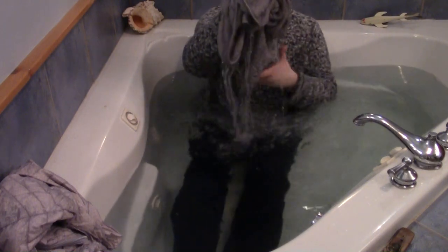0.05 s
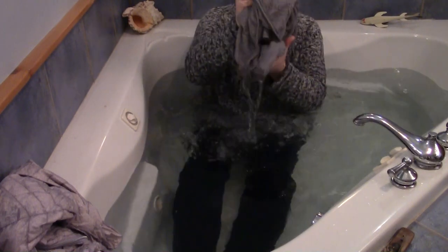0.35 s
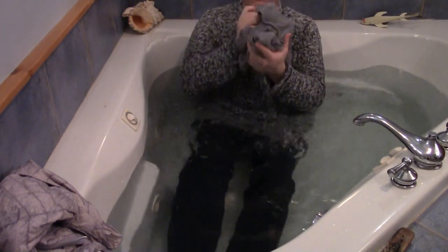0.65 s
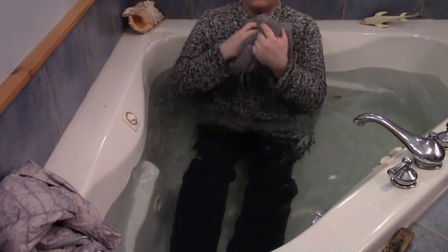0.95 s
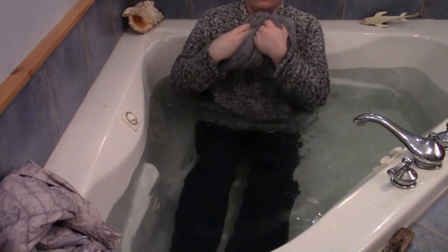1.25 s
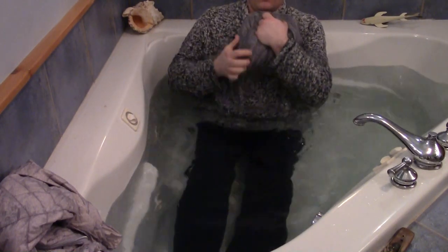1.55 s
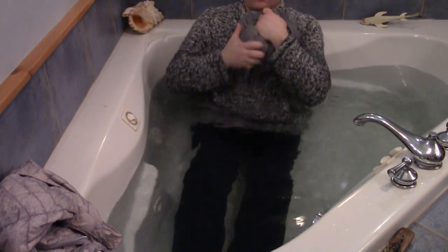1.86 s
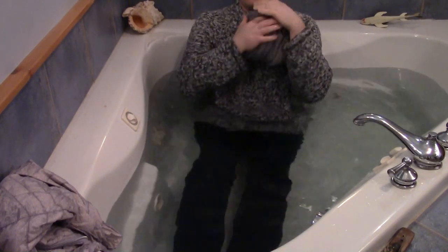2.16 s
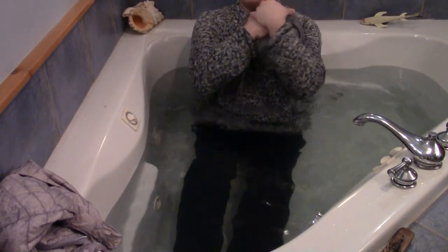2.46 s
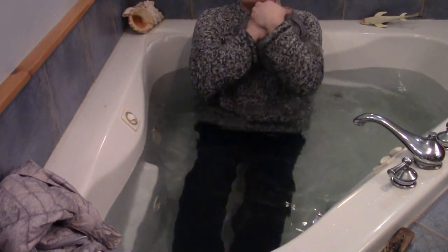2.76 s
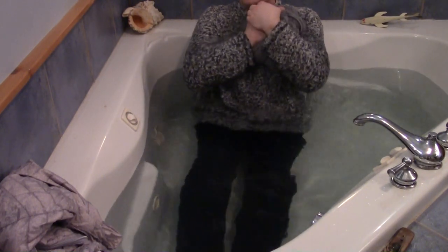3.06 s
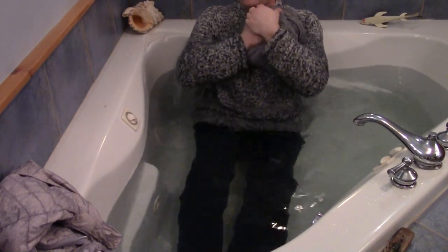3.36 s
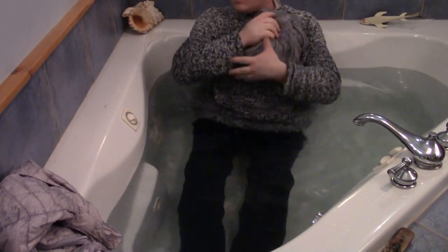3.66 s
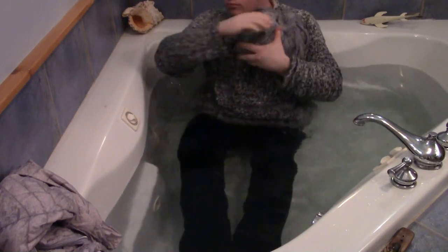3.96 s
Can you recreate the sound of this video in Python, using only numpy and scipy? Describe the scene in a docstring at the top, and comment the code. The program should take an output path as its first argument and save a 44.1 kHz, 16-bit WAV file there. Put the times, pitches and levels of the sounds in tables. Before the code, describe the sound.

Water pours and drips into a full bathtub as a soaked cloth is squeezed.

```python
"""Water pours and patters into a full bathtub, off a soaked cloth squeezed against wet clothes.
It thins to a dribble and spurts again with each squeeze; each drop is a tiny impact and a ringing bubble.
Nearer the microphone, single plops and wet spats stand out. The tub and the tiled bathroom ring
around them, over faint room air and mains hum. The image is nearly mono."""
import sys
import numpy as np
from scipy import signal
from scipy.fft import rfft, irfft, next_fast_len
from scipy.io import wavfile

SR = 44100
rng = np.random.default_rng(int(sys.argv[2]) if len(sys.argv) > 2 else 0)


def dump(signal):
    """Clip the signal to [-1, 1] and save it as 16-bit WAV at the path in sys.argv[1]."""
    limited = np.clip(np.atleast_2d(signal).T, -1, 1)
    pcm = np.round(limited * 32767).astype(np.int16)
    wavfile.write(sys.argv[1], SR, pcm)


N = 176400
TIME = np.arange(N) / SR


def amp(db):
    """Decibels to gain."""
    return 10 ** (np.asarray(db) / 20)


def unit(x):
    """Scales to rms 1."""
    return x / np.sqrt(np.mean(x ** 2) + 1e-20)


def read(points, hz):
    """Reads a table on a log-frequency axis."""
    table_hz, value = np.transpose(points)
    return np.interp(np.log(hz + 1), np.log(table_hz + 1), value)


def shaped(x, colour):
    """Filters by a table of (frequency [Hz], gain [dB])."""
    size = next_fast_len(N + 4096)
    gain = amp(read(colour, np.fft.rfftfreq(size, 1 / SR)))
    return irfft(rfft(x, size) * gain, size)[..., :N]


def add(mix, start_s, sound):
    """Mixes a sound in at a time."""
    part = mix[max(round(start_s * SR), 0):][:len(sound)]
    part += sound[:len(part)]


# Colour of the bathroom's still air (frequency [Hz], relative level [dB])
AIR_COLOUR = [(20, -26), (45, -4), (90, -5.5), (170, 6), (300, 7), (1000, -2.5), (15000, -34)]

def room_tone(air_db=-61, hum_hz=60.2, hum_db=-89):
    """Faint air all around the microphone, partly shared by left and right, with a trace of mains hum."""
    shared, left, right = (unit(shaped(noise, AIR_COLOUR)) for noise in rng.standard_normal((3, N)))
    air = 0.79 * shared + 0.65 * np.array([left, right])
    return amp(air_db) * air + amp(hum_db) * np.sin(2 * np.pi * hum_hz * TIME)


# Decay of the tiled room (frequency [Hz], time to fall 60 dB [s])
TILE_DECAY = [(250, 0.67), (700, 0.46), (2000, 0.34), (5000, 0.43), (14000, 0.23)]

def tile_tail(size=24000, build_s=0.011):
    """Dense reflections off the tiles, the treble dying first; energy 1."""
    taps = rng.standard_normal(size) * (rng.random(size) < 0.2)
    taps *= np.minimum(np.arange(size) / SR / build_s, 1)
    hz, t, spectrum = signal.stft(taps, SR, nperseg=256)
    decay = amp(-60 * t / read(TILE_DECAY, hz)[:, None])
    tail = signal.istft(spectrum * decay, SR, nperseg=256)[1][:size]
    return tail / np.linalg.norm(tail)


def path_to_microphone(echo_db, tail_db=-2, early_db=-6.5, early_span_s=0.016, echoes=12):
    """From one spot in the bath: direct sound, first echoes off the tub walls, then the tail."""
    response = amp(tail_db + echo_db) * tile_tail()
    response[0] += 1  # direct sound
    echo_gain = amp(early_db + echo_db) / np.sqrt(echoes)
    for place, sign in zip(rng.random(echoes), rng.choice([-1, 1], echoes)):
        delay_s = 0.001 + early_span_s * place
        response[round(delay_s * SR)] += sign * echo_gain
    return response / np.linalg.norm(response)


# Resonances of the tub and room (frequency [Hz], gain [dB], time to fall 60 dB [s])
TUB_MODES = [(330, -21, 0.78), (440, 6, 0.24), (545, -6.5, 0.27), (658, 0, 0.32), (853, 5, 0.47),
             (1130, -3.5, 0.45)]
# Left-right difference at the microphone (frequency [Hz], side gain [dB])
STEREO_WIDTH = [(200, -82), (600, -39), (1200, -43), (2000, -24.5), (4000, -20.5), (14000, -15.5)]

def bathroom(far, near, near_echo_db=-0.5):
    """Each spot has its own reflections, a little weaker near the microphone; all of them ring the tub."""
    spots = [(sound, 0) for sound in far] + [(sound, near_echo_db) for sound in near]
    mid = sum(signal.oaconvolve(sound, path_to_microphone(echo_db))[:N] for sound, echo_db in spots)
    total = sum(sound for sound, _ in spots)
    for hz, db, t60 in TUB_MODES:
        q = hz * t60 * np.pi / np.log(1000)
        mid += amp(db) * signal.lfilter(*signal.iirpeak(hz, q, SR), total)
    side = shaped(signal.oaconvolve(total, tile_tail())[:N], STEREO_WIDTH)
    return np.array([mid + side, mid - side])


# Wet smacks near the microphone (time [s], centre [Hz], level before colour [dB], decay [s])
NEAR_SPATS = [(0.256, 5000, -24.5, 0.014), (0.341, 3740, -16, 0.0019), (0.575, 7460, -26, 0.0035),
              (0.8113, 3200, -28, 0.0038), (0.811, 11500, -33, 0.005), (0.839, 11000, -34.5, 0.0027),
              (0.8576, 13000, -32.5, 0.0035), (0.9057, 6000, -26, 0.0039), (0.9717, 3280, -24, 0.0029),
              (0.966, 9900, -31, .002), (0.972, 9400, -27.5, 0.0046), (1.025, 9700, -29.5, 0.0066),
              (1.021, 3900, -26.5, 0.0041), (1.1513, 3900, -26.5, 0.027), (1.636, 3350, -32, 0.0082),
              (1.682, 2740, -28, 0.0067), (1.6894, 8450, -24, 0.0022), (1.699, 7760, -21.5, 0.0015),
              (1.9015, 8500, -32, 0.0018), (2.0033, 6200, -30.5, 0.0047), (2.148, 8900, -36, 0.0058),
              (2.19, 915, -29.5, 0.0047), (2.493, 3140, -33, 0.0069), (2.6048, 10100, -33.5, 0.0028),
              (2.6446, 6000, -35, 0.0082), (2.646, 2800, -32, 0.0086), (2.694, 3100, -30.5, 0.013),
              (2.722, 3780, -33, 0.009), (3.034, 5650, -26.5, 0.017), (3.172, 8000, -30, .003),
              (3.393, 3040, -22.5, 0.0021), (3.5017, 4370, -31, 0.0022), (3.564, 2900, -30, 0.0087),
              (3.737, 3000, -23.5, 0.0024), (3.7387, 1410, -22, 0.0033), (3.931, 2200, -28.5, 0.0028)]
# Their colour (frequency [Hz], gain [dB])
SPAT_COLOUR = [(60, -24), (250, -27), (1000, -4.5), (4500, -2), (9000, -2.5), (11500, -2.5), (15000, -7)]

def spats(relative_bandwidth=0.53):
    """Brief bursts of spray as water or wet cloth smacks down."""
    out, t = np.zeros(N), np.arange(4096) / SR
    for start_s, hz, db, decay_s in NEAR_SPATS:
        noise = rng.standard_normal(len(t))
        burst = signal.lfilter(*signal.iirpeak(hz, 1 / relative_bandwidth, SR), noise)
        top_hz = min(1.46 * hz, SR / 3)
        burst = signal.lfilter(*signal.butter(2, top_hz, fs=SR), burst)
        add(out, start_s, amp(db) * unit(burst) * np.exp(-t / decay_s))
    return shaped(out, SPAT_COLOUR)


def bubble(hz, cycles, rise=0.1095, attack_cycles=1.2):
    """A dying sine whose pitch rises as the bubble nears the surface, by the share `rise` per decay time."""
    turns = np.arange(0, 7 * cycles, hz / SR)
    envelope = (1 - np.exp(-turns / attack_cycles)) * np.exp(-turns / cycles)
    phase = 2 * np.pi * turns * (1 + rise * turns / cycles / 2)
    return envelope / envelope.max() * np.sin(phase)


# Bubble plops near the microphone, plus one wet slap with a low thud near 3.74 s
# (time [s], pitch [Hz], level before colour [dB], decay [cycles])
PLOPS_AND_SLAP = [(.003, 1053, -34, 8.2), (.034, 330, -26, 1.8), (.036, 2036, -25, 43),
                  (0.051, 1810, -21, 6.9), (0.058, 1053, -21.5, 8.5), (.076, 925, -22.5, 4.1),
                  (.078, 2980, -26, 20), (.115, 680, -23.5, 6.1), (.135, 582, -26.5, 3.6),
                  (.156, 1080, -23, 9), (.243, 1063, -28, 14), (.318, 587, -27.5, 3.8),
                  (.328, 1200, -21, 2.9), (0.334, 349.2, -24.5, 10.5), (.378, 825, -24, 3.5),
                  (.391, 716, -25, 3.5), (.412, 3260, -22, 11), (0.482, 1094, -27, 4.3),
                  (.505, 2060, -31.5, 14), (.526, 853, -28, 10), (.551, 765, -22, 1.5),
                  (.597, 837, -29, 3.1), (.654, 6870, -38, 13), (0.691, 1670, -31, 9.8),
                  (.712, 740, -35, 5.5), (.78, 733, -35.5, 8), (0.859, 4150, -22, 5.4),
                  (.902, 532, -33, 3.9), (.971, 301, -23.5, 1.2), (0.975, 409, -16.5, 1.6),
                  (.992, 545, -28.5, 7.6), (1.023, 440, -42, 1.5), (1.078, 1670, -27.5, 5.9),
                  (1.104, 1670, -35, 7.9), (1.217, 1100, -28, 2.5), (1.249, 1050, -28, 4.1),
                  (1.3, 1070, -21.5, 2.8), (1.318, 1096, -26, 7.3), (1.36, 1360, -23, 5),
                  (1.376, 1130, -25, 11.4), (1.39, 1275, -27.5, 5.7), (1.401, 3320, -26.5, 4.8),
                  (1.503, 544, -37, 4.7), (1.619, 2870, -28, 7.8), (1.734, 1670, -30.5, 17),
                  (1.75, 3780, -29, 11), (1.84, 2570, -30.5, 33), (1.976, 493, -41.5, 7),
                  (2.023, 528, -40, 8.7), (2.189, 522, -33.5, 3.3), (2.222, 489, -34, 6.5),
                  (2.226, 724, -31, 5.1), (2.381, 1620, -37, 6), (2.43, 1970, -34.5, 10),
                  (2.484, 850, -35.5, 4), (2.495, 790, -27, 6.2), (2.554, 2870, -35, 8.8),
                  (2.634, 2700, -37, 9), (2.702, 1170, -34, 5.1), (2.971, 7080, -24, 22),
                  (2.987, 4110, -27, 29), (2.989, 1238, -21, 9.6), (3.002, 1120, -25.5, 8.8),
                  (3.016, 1236, -22, 5.3), (3.036, 1260, -31, 5.6), (3.124, 800, -29, 5.3),
                  (3.143, 713, -30.5, 10.6), (3.168, 763, -30, 3.4), (3.225, 505, -33.5, 5.6),
                  (3.27, 936, -35, 5.4), (3.292, 495, -31.5, 4.9), (3.312, 443, -36.5, 5.9),
                  (3.358, 1210, -31, 7.9), (3.38, 845, -34, 6), (3.467, 685, -32, 21),
                  (3.545, 774, -30, 9.7), (3.665, 703, -31, 9), (3.694, 706, -31, 3.1),
                  (3.7349, 4070, -24, 3), (3.7378, 3780, -20.5, 2.5), (3.7395, 860, -24, 1.3),
                  (3.741, 1380, -23, 1.3), (3.748, 320, -30.5, 2.4), (3.758, 702, -30, 15.5),
                  (3.95, 1290, -32, 9)]
# Their colour (frequency [Hz], gain [dB])
PLOP_COLOUR = [(40, -34), (120, -6), (200, -24), (280, -6.5), (600, -2.5), (4000, -2.5)]

def plops_and_slap(twin_db=-8, twin_spread=0.14):
    """Dying tones, each with a weaker, later twin: bubbles plop; a cluster of short tones makes the slap."""
    out = np.zeros(N)
    twins = rng.random((len(PLOPS_AND_SLAP), 2))
    for (start_s, hz, db, cycles), (detune, lag) in zip(PLOPS_AND_SLAP, twins):
        add(out, start_s, amp(db) * bubble(hz, cycles, rise=0.007))
        twin_hz = hz * np.exp(twin_spread * (2 * detune - 1))
        twin_s = start_s + 0.014 * (0.3027 + lag)
        add(out, twin_s, amp(db + twin_db) * bubble(twin_hz, cycles / 2))
    return shaped(out, PLOP_COLOUR)


def spurts(seconds, depth_db, step_s=0.03):
    """A wandering random gain that clumps the drops."""
    swings = np.clip(rng.standard_normal(1024), -2, 2)
    return amp(depth_db * np.interp(seconds / step_s, np.arange(1024), swings))


def patter(low_hz, high_hz, per_s, cycles, spread_db, impact=0, pitches=24, spots=4):
    """Random drops of one class landing around the bath: impacts and bubble rings over a soft wash."""
    lands = rng.random(N) < per_s / SR
    strength = lands * amp(spread_db * np.minimum(rng.exponential(1, N), 3.5))
    strength *= rng.choice([-1, 1], N)
    strength *= spurts(TIME, depth_db=2.15)
    pitch_index, rings = rng.integers(0, pitches, N), np.zeros((spots, N))
    for k, (detune, sustain) in enumerate(rng.random((pitches, 2))):
        hz = low_hz * (high_hz / low_hz) ** ((k + detune) / pitches)
        ring = bubble(hz, cycles * (0.5 + sustain), attack_cycles=0.54)
        onsets = np.flatnonzero(strength * (pitch_index == k))
        gains = strength[onsets] * spurts(onsets / SR, depth_db=3)  # bubbles of one size also clump
        drops = np.outer(gains, ring / np.linalg.norm(ring))
        samples = onsets[:, None] + np.arange(len(ring))
        rings[k % spots] += np.bincount(samples.ravel(), drops.ravel(), N)[:N]
    impacts = strength * (pitch_index % spots == np.arange(spots)[:, None])
    wash = amp(-9) * rng.standard_normal((spots, N))
    drive = impact * unit(impacts) + wash
    band = signal.butter(3, [low_hz, min(high_hz, SR / 2 - 1000)], "band", fs=SR, output="sos")
    splash = np.std(drive) * unit(signal.sosfilt(band, drive))
    return unit(unit(rings) + splash) / np.sqrt(spots)


# Bubbling where the water lands, farther from the microphone
# (time [s], large-bubble level [dB], small-bubble level [dB])
BUBBLING_LEVELS = [(0, -36.5, -27.5), (.06, -38.5, -37.5), (.2, -36, -34.5), (.33, -39, -39),
                   (.45, -47.5, -38), (0.581, -43, -39), (.64, -47, -46), (.8, -47.5, -43),
                   (.85, -43.5, -41.5), (1, -47.5, -39), (1.17, -40, -41), (1.27, -44, -49.5),
                   (1.39, -45.5, -43), (1.55, -46, -49.5), (1.68, -51, -44), (1.81, -56.5, -49),
                   (1.98, -44, -41.5), (2.12, -51.5, -46.5), (2.26, -49.5, -47.5), (2.38, -59, -51.5),
                   (2.49, -47.5, -48.5), (2.61, -50.5, -51), (2.68, -48.5, -44), (2.73, -41, -39),
                   (2.86, -42, -39.5), (2.98, -54, -41), (3.01, -39, -33), (3.12, -45, -42),
                   (3.27, -43, -39.5), (3.36, -54, -47.5), (3.45, -47.5, -41), (3.58, -44, -38.5),
                   (3.64, -56, -51.5), (3.72, -53, -47.5), (3.76, -38.5, -43), (3.84, -74, -51),
                   (3.91, -55, -54), (3.95, -45, -50.5), (4, -55, -44)]
# Fine splatter on the bathwater (time [s], droplet level [dB], spray level [dB])
SPLATTER_LEVELS = [(0.0, -30, -37), (0.24, -36, -35.5), (0.26, -31.5, -34.5), (0.37, -39, -38),
                   (0.74, -37.5, -45), (0.79, -44.5, -41.5), (0.94, -38, -43), (1.04, -40.5, -57),
                   (1.09, -43, -43), (1.155, -41, -34.5), (1.32, -45.5, -50.5), (1.39, -41.5, -46.5),
                   (1.53, -48.5, -50), (1.6, -45, -46), (1.68, -38, -44), (1.69, -38, -39),
                   (1.8, -43.5, -45), (2.04, -44.5, -47.5), (2.27, -49, -45), (2.46, -51, -53),
                   (2.49, -50, -44), (2.58, -49, -58), (2.66, -48.5, -52.5), (2.73, -40, -48.5),
                   (2.85, -43.5, -43), (2.97, -37.5, -48), (3.05, -34, -38), (3.13, -37, -46),
                   (3.17, -36, -43.5), (3.35, -43, -43.5), (3.55, -41.5, -39.5), (3.56, -34.5, -45),
                   (3.62, -45.5, -50), (3.735, -51, -45.5), (3.75, -46, -43.5), (3.79, -46.5, -52.5),
                   (3.91, -57, -54), (3.93, -43.5, -54), (4.0, -59, -42)]
# Large bubbles, small bubbles, droplets, spray
# (lowest [Hz], highest [Hz], rate [1/s], typical decay [cycles], size spread [dB], impact strength [0-1])
DROP_CLASSES = [(253, 776, 260, 1.92, 2, 0.35), (800, 2570, 850, 4.33, 3, 0.51),
                (2504, 6360, 900, 6.1, 3.5, 0.38), (5440, 15800, 1500, 7.2, 4.5, 0.07)]
# Colour laid over all the splashing (frequency [Hz], gain [dB])
SPLASH_COLOUR = [(60, -22), (150, -49), (235, -5.5), (320, -3), (410, -6.5), (520, -1.5), (800, -2),
                 (1200, 0.5), (2000, 0.5), (3000, 0), (4500, -2.5), (6000, -5), (8000, -1.5), (10500, -3),
                 (13000, -8), (16000, -11.5)]

def falling_water(tinkle_db=-6.5):
    """Drops swell and thin as the cloth is squeezed; tiny, longer-ringing bubbles follow the droplets."""
    large, small, droplets, spray = (
        amp(np.interp(TIME, times, db))
        for times, *columns in (np.transpose(BUBBLING_LEVELS), np.transpose(SPLATTER_LEVELS))
        for db in columns)
    levels = (large, small, droplets, spray)
    water = sum(level * patter(*drops) for level, drops in zip(levels, DROP_CLASSES))
    tinkle = patter(low_hz=1800, high_hz=11500, per_s=97, cycles=16.8, spread_db=4.1, pitches=48)
    return shaped(water + amp(tinkle_db) * droplets * tinkle, SPLASH_COLOUR)


def scene():
    """The bath from the microphone's place: pouring water, with plops and spats a little nearer."""
    return bathroom(far=falling_water(), near=[plops_and_slap(), spats()]) + room_tone()


def record(dry, cutoff_hz=15750):
    """The recorder's band limit cuts off the highest treble."""
    lowpass = signal.firwin(1023, cutoff_hz, window=("kaiser", 9), fs=SR)
    return signal.oaconvolve(dry, lowpass[None], "same")


dry = scene()
out = record(dry)
dump(out)
```